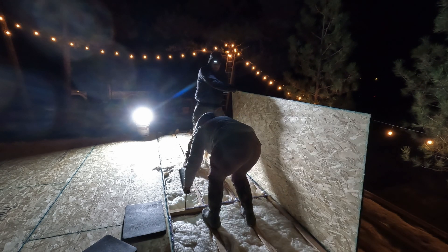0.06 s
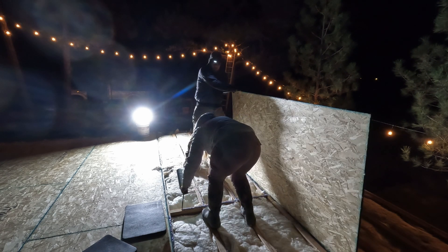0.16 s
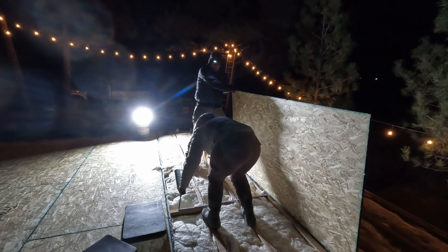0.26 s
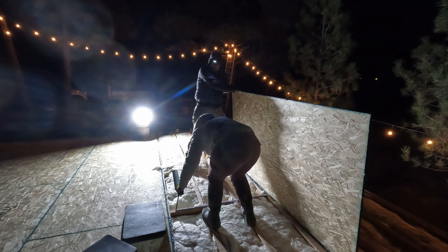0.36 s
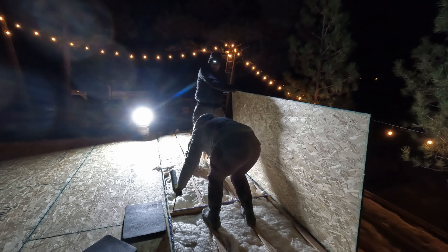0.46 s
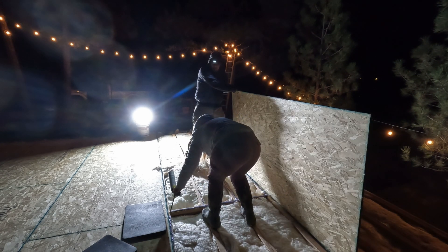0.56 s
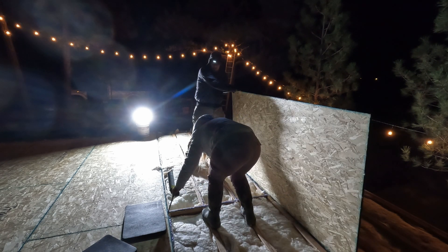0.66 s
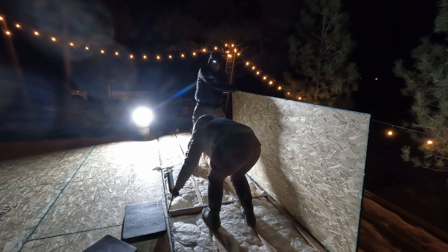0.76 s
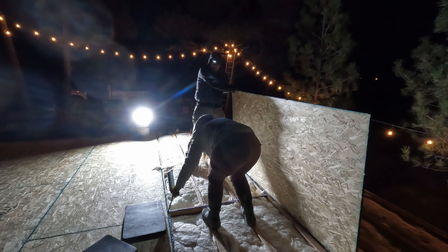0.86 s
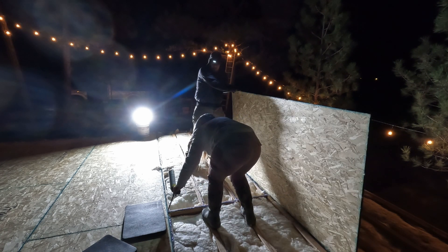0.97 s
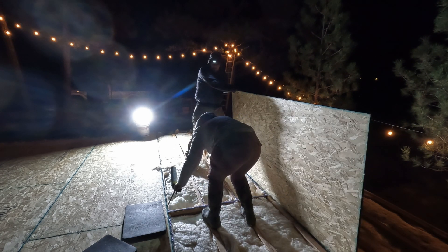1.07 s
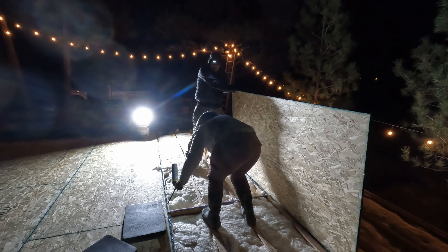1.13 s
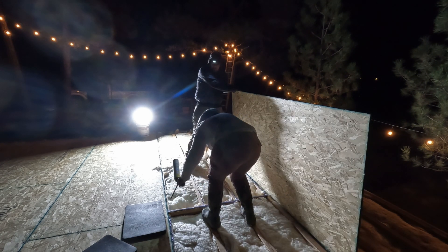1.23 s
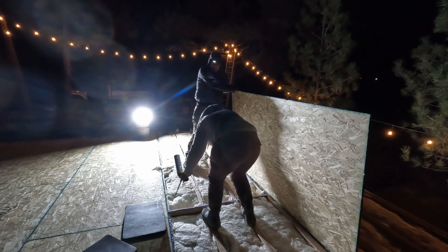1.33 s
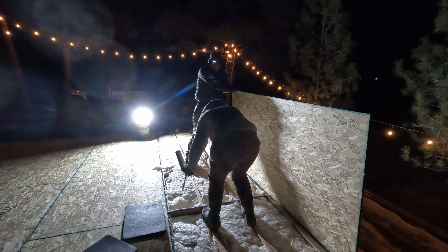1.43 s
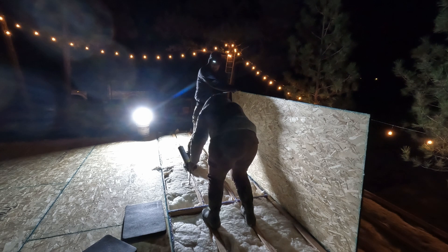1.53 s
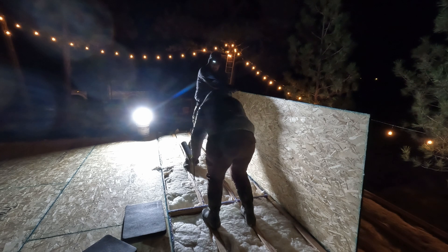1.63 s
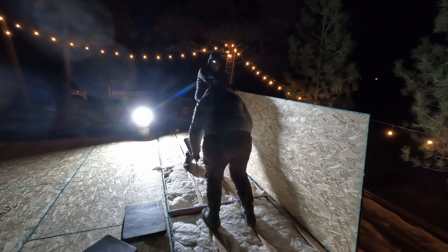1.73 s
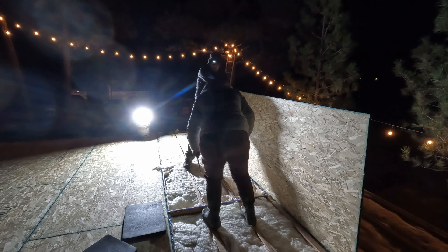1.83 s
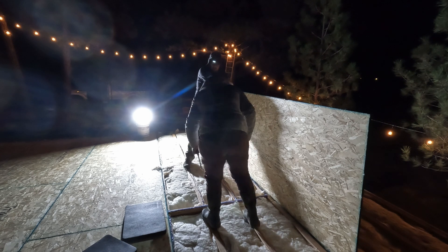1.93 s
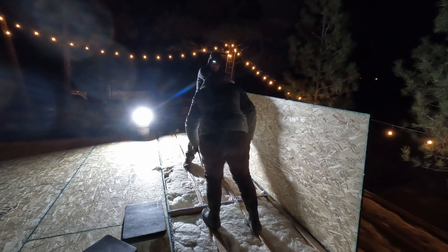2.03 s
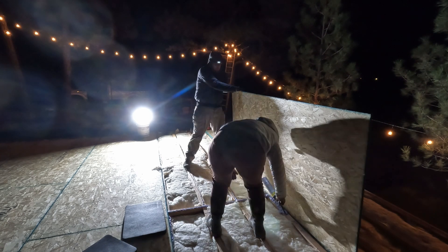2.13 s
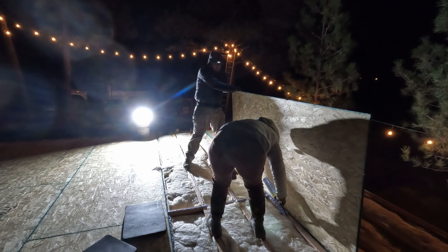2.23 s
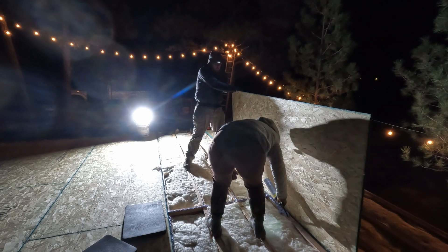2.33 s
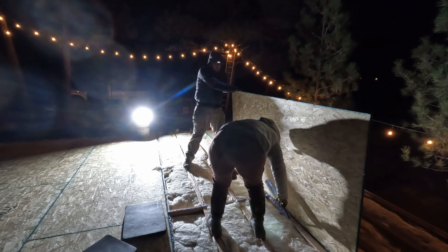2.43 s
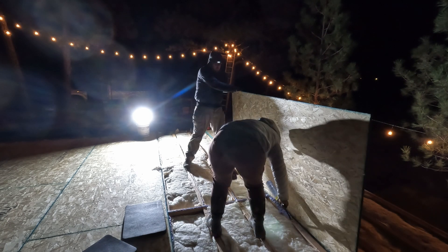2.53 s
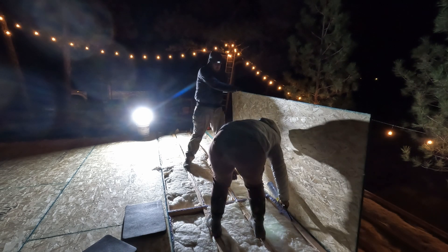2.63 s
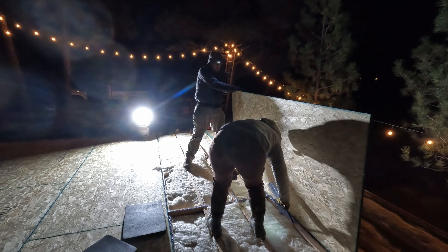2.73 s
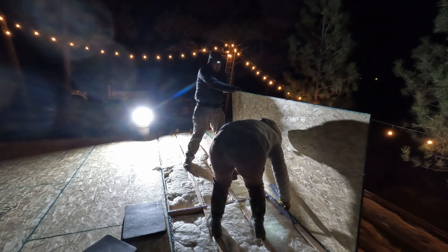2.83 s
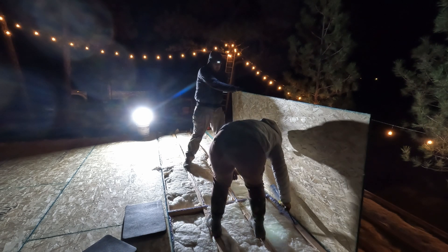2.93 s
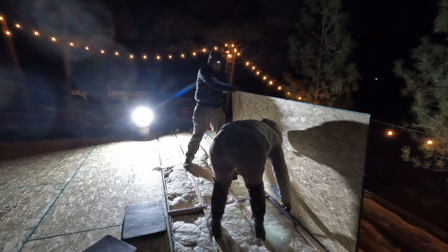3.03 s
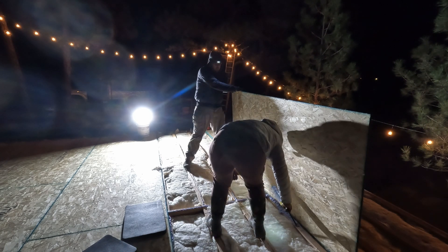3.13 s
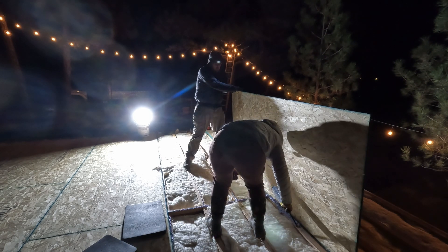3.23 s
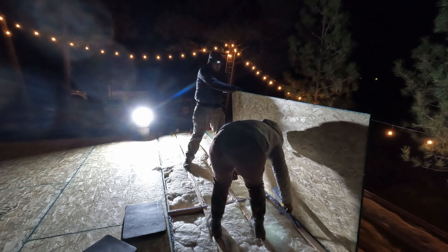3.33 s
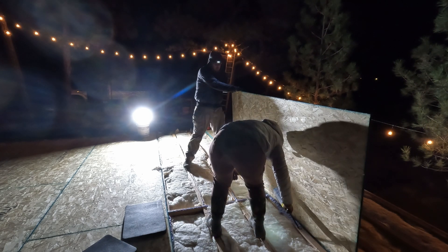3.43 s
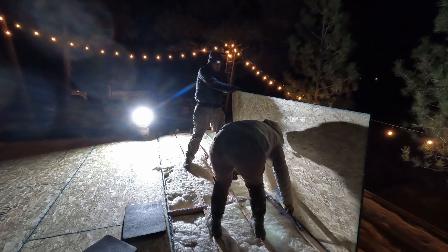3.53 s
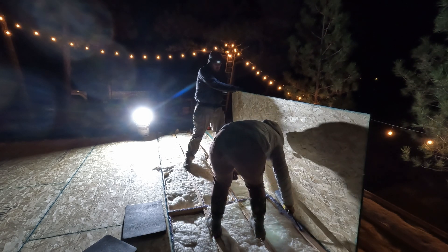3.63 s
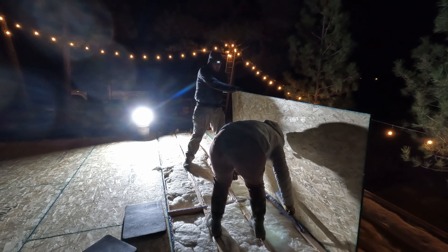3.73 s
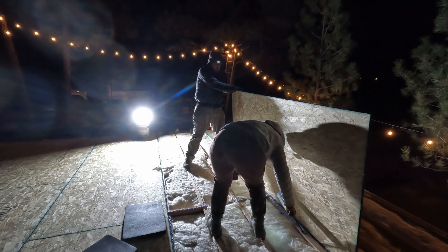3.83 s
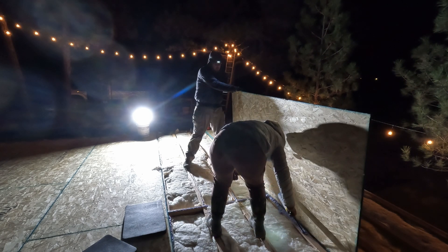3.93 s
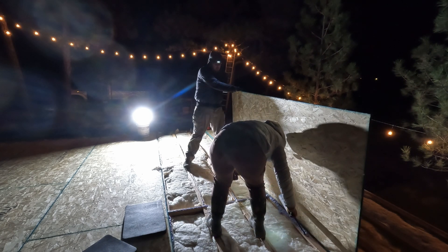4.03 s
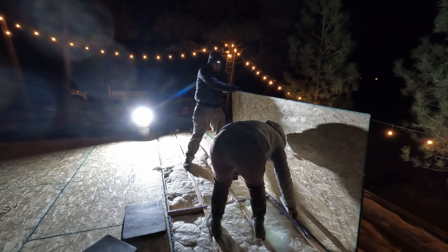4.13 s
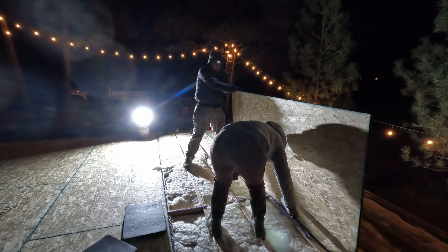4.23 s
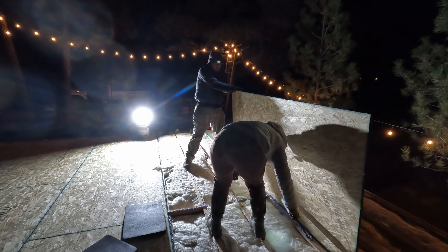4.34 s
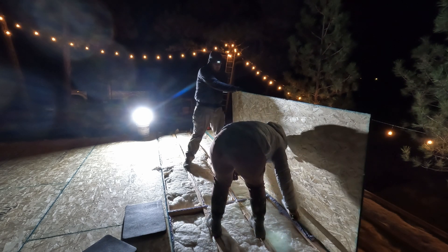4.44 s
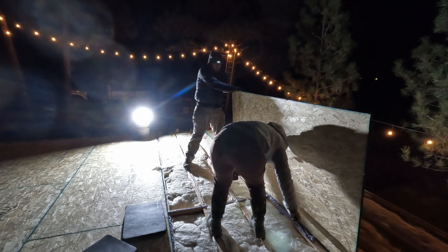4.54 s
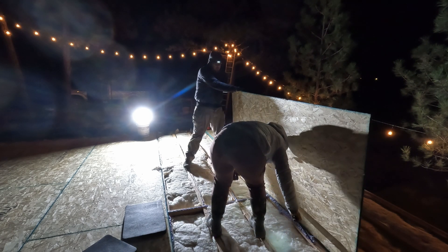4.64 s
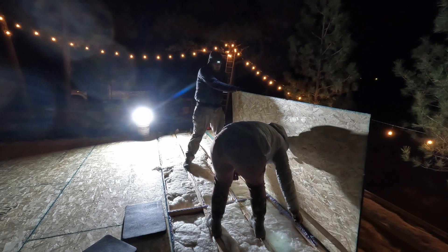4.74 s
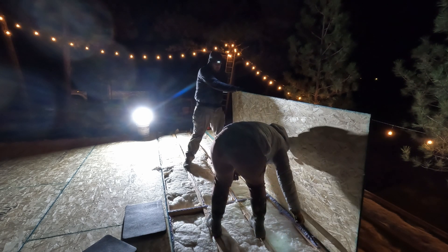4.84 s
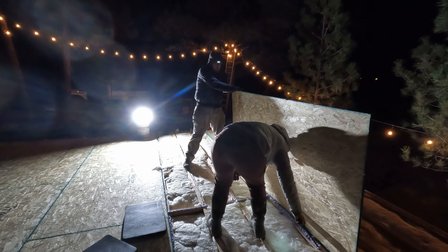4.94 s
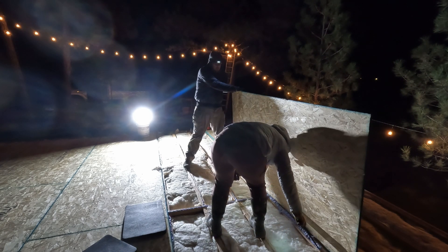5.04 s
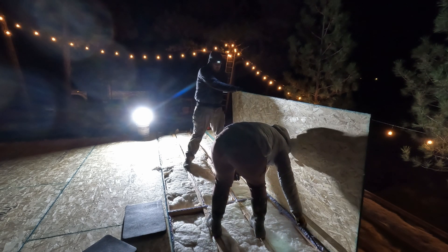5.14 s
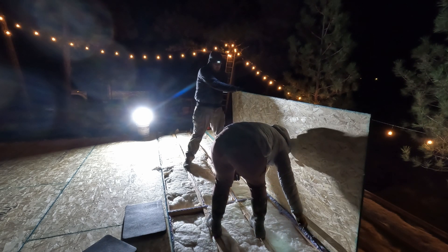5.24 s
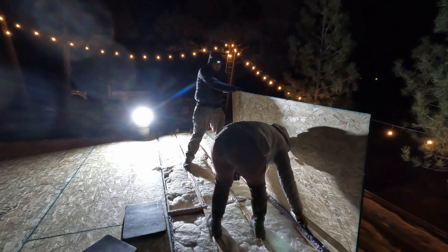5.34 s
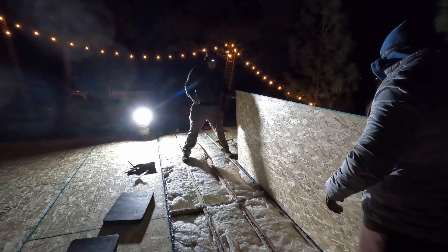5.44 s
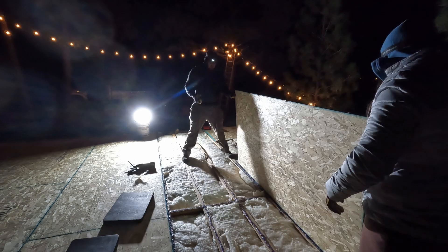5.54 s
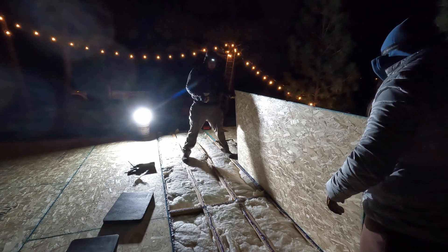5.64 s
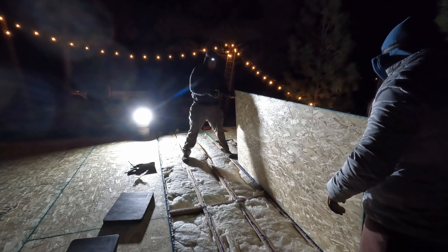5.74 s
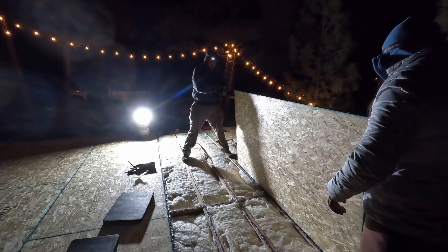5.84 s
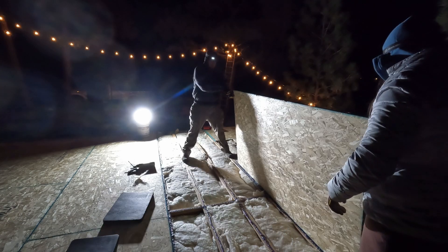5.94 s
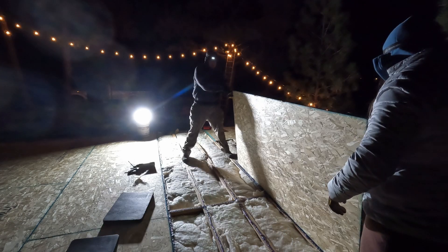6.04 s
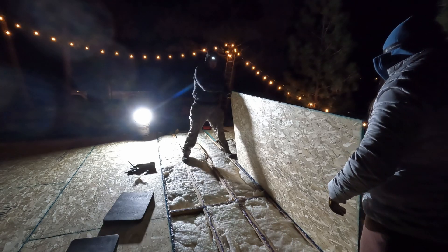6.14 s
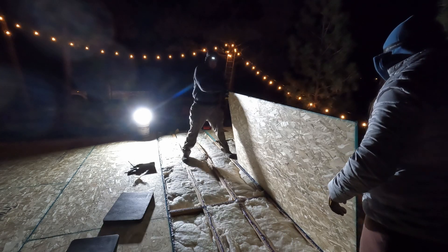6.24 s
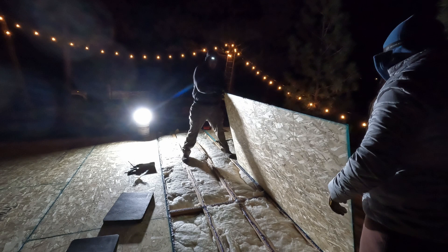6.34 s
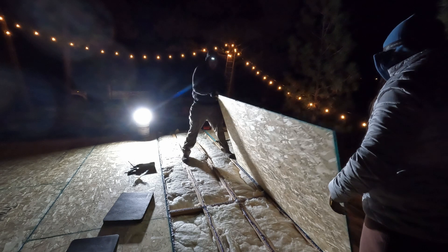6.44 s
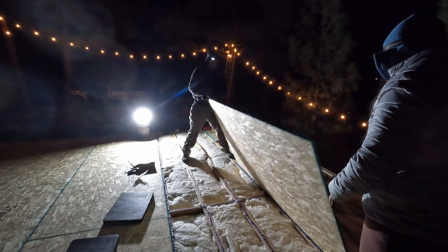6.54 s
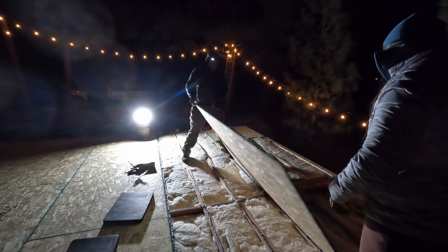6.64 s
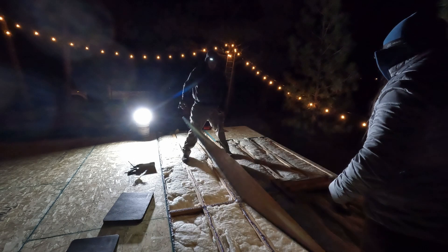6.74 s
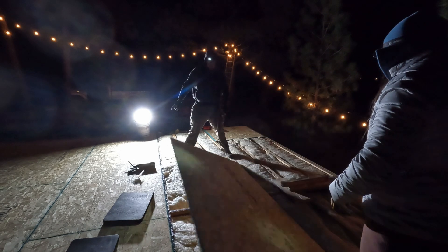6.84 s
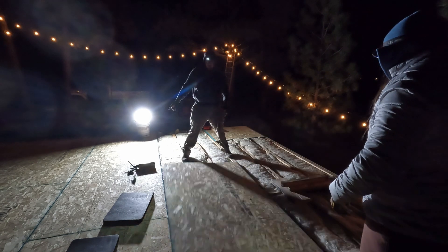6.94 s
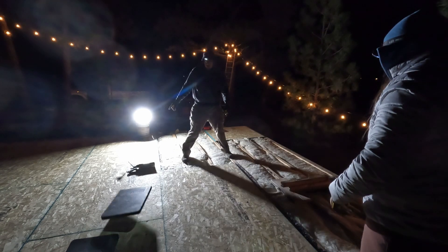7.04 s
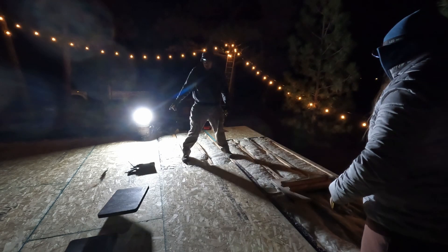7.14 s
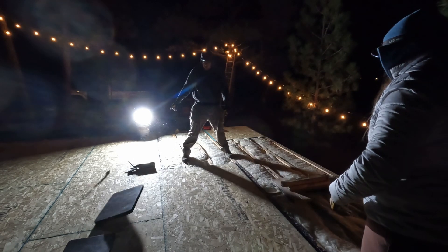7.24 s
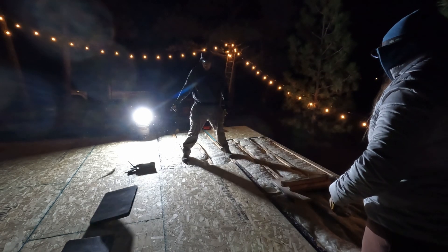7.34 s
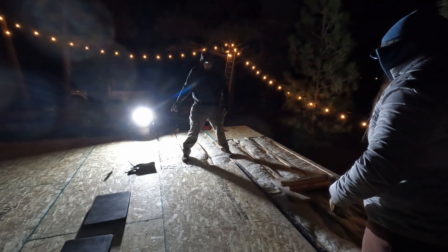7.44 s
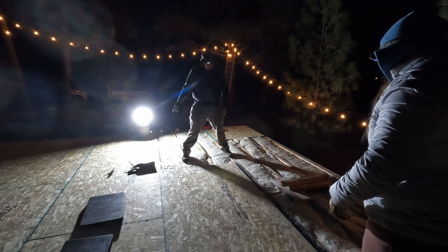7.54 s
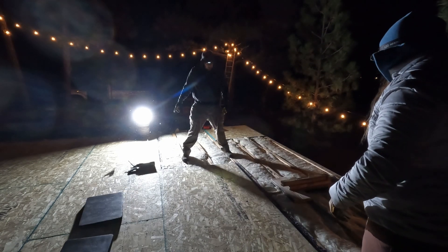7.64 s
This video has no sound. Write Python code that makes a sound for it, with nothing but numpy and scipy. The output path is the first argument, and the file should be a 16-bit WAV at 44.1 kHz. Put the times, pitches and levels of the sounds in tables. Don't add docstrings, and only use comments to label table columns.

```python
import sys
import numpy as np
from scipy import signal
from scipy.fft import rfft, irfft, next_fast_len
from scipy.io import wavfile
from scipy.ndimage import uniform_filter1d

SR = 44100
rng = np.random.default_rng(int(sys.argv[2]) if len(sys.argv) > 2 else 0)


def invert_db(x):
    u = np.asarray(x, float) / 20
    return 10 ** u


def transcribe(signal):
    frames = np.atleast_2d(signal).T
    limited = np.clip(frames, -1, 1)
    pcm = np.round(limited * 32767).astype(np.int16)
    wavfile.write(sys.argv[1], SR, pcm)


N = 339129
WIDE = next_fast_len(N, True)
BINS_HZ = np.fft.rfftfreq(WIDE, 1 / SR)

# (time [s], crackle level [dB], foam cavity [Hz], nozzle jet [Hz], small-cell fizz level [dB])
BEADS = [
    [(0, -50.5, 2000, 5340, -58), (.45, -50.5, 1920, 4900, -59), (.62, -48.5, 1890, 4200, -55),
     (.8, -45, 2000, 3630, -56), (.88, -53.5, 1940, 3600, -73), (.95, -68.5, 2000, 3600, -82)],
    [(2.09, -48, 1690, 4000, -60.5), (2.45, -45.5, 1700, 3930, -59), (2.8, -45, 1655, 5750, -62.5),
     (3.8, -44, 1680, 6050, -60.5), (4.6, -44, 1660, 5070, -57), (4.85, -44, 1500, 4100, -52),
     (5.33, -50, 1370, 4350, -57.5), (5.46, -95, 1530, 4700, -83)],
]
# (time [s], length [ms], gas level [dB], pop level [dB], jet [Hz])
SPITS_FIRST_BEAD = [(0.0005, 6, -51.5, -42, 3770), (0.0552, 9.5, -47, -37, 3510),
                    (0.1338, 9.5, -45.5, -36, 3640), (0.1636, 5, -44.5, -40.5, 4750),
                    (0.24, 10.5, -46.5, -37.5, 3790), (0.2976, 5.4, -42, -35, 4530),
                    (0.338, 8.4, -42, -38.5, 5410), (0.3576, 4.8, -44, -33.5, 4550),
                    (0.436, 8.7, -43.5, -34, 4220), (0.4518, 3.8, -58, -39, 3390),
                    (0.457, 7, -56, -41, 3490), (0.473, 1.5, -58, -40, 3440), (0.501, 7.7, -63, -44, 3820),
                    (0.5292, 7.6, -53.5, -38.5, 4860), (0.6115, 13.4, -50.5, -34.5, 3720),
                    (0.699, 2.8, -63, -39, 3500), (0.7266, 10, -41, -31.5, 3580),
                    (0.7437, 9.1, -57, -43, 3520), (0.7683, 7.8, -54, -34.5, 3640)]
# (time [s], length [ms], gas level [dB], pop level [dB], jet
# [Hz])
SPITS_SECOND_BEAD = [(2.2191, 7.7, -46, -34, 3540), (2.2502, 4.4, -44.5, -35, 4300),
                     (2.3077, 9.8, -43, -32.5, 3670), (2.3478, 6.3, -45, -34, 3800),
                     (2.375, 7.6, -45, -35, 3780), (2.389, 8.3, -44.5, -38.5, 3650),
                     (2.4862, 13.6, -40.5, -34.5, 3650), (2.5459, 7.6, -45, -33, 3630),
                     (2.589, 7.9, -45, -33.5, 3860), (2.6027, 10.6, -41, -33.5, 3840),
                     (2.647, 8.9, -39.5, -37, 5200), (2.6868, 3.5, -44.5, -33.5, 3720),
                     (2.706, 7.3, -34.5, -32, 3900), (2.8055, 7, -42.5, -31, 3630),
                     (2.8194, 4.5, -49, -33.5, 3620), (2.901, 5.5, -43, -31, 4330),
                     (2.9725, 8.5, -39, -33.5, 3840), (3.0495, 7.9, -42.5, -29, 4500),
                     (3.079, 8, -41, -33, 5300), (3.1324, 1.4, -45.5, -30, 6190),
                     (3.1559, 10.8, -42, -34.5, 5200), (3.2015, 6.9, -46.5, -35.5, 3780),
                     (3.2115, 8.4, -45, -35.5, 6240), (3.2616, 5.6, -41, -32, 3560),
                     (3.3444, 9.7, -49, -35.5, 5180), (3.3811, 11, -40.5, -33.5, 4140),
                    (3.4631, 5.9, -48.5, -37.5, 3920), (3.4966, 7.6, -40.5, -32, 5130),
                    (3.527, 10.5, -37.5, -30.5, 5570), (3.581, 7, -40.5, -32.5, 6290),
                    (3.655, 4.5, -42, -34.5, 5890), (3.6944, 9.4, -41, -31, 5630),
                    (3.779, 4.9, -37, -30, 5720), (3.8213, 9.1, -41, -30.5, 5250),
                    (3.8421, 14.5, -47.5, -34.5, 4920), (3.932, 7.8, -39, -30.5, 5140),
                    (3.9467, 2.9, -47, -34, 4640), (3.965, 5.9, -41, -35.5, 4720),
                    (3.9842, 4.8, -38.5, -33.5, 5660), (4.096, 14.6, -37, -33, 5650),
                    (4.149, 7.2, -37.5, -35, 5410), (4.192, 11.4, -35, -37, 4900),
                    (4.2552, 12.6, -32.5, -34.5, 6270), (4.3418, 8.5, -40, -33.5, 5560),
                    (4.394, 7.7, -36, -32, 5780), (4.4474, 9.8, -37.5, -34, 5350),
                    (4.4817, 10.5, -39, -35, 5040), (4.5459, 11.6, -37, -32.5, 5130),
                    (4.6042, 7.7, -38.5, -35.5, 5300), (4.6696, 13.4, -32, -32, 4530),
                     (4.704, 7.5, -44, -34.5, 5640), (4.758, 5.6, -35, -33, 5600),
                      (4.8245, 3.9, -46, -35, 4220), (4.833, 12.8, -43.5, -33, 3840),
                      (4.8584, 3.8, -46, -39, 3990), (4.8955, 7.3, -39.5, -32.5, 4940),
                      (4.942, 17, -45, -35.5, 4440), (5.0085, 9.4, -42.5, -36, 4860),
                      (5.0285, 7.6, -46, -32.5, 4040), (5.0408, 5.8, -45.5, -34, 4690),
                      (5.1027, 10.8, -35, -35, 4970), (5.1288, 3.4, -42, -28.5, 4190),
                      (5.1484, 12.4, -39.5, -33, 4630), (5.1881, 2.4, -38, -33, 4250),
                      (5.1982, 9.2, -33, -33, 4630), (5.2646, 2.6, -39.5, -29.5, 5050),
                      (5.2924, 2, -53, -34.5, 3830), (5.3, 10, -34, -28.5, 5100),
                      (5.329, 5.1, -34.5, -30.5, 4900)]
# (time [s], length [ms], pop level [dB])
WET_PLOPS = [(0.041, 2.1, -34.5), (.564, 1.5, -44), (0.598, 2.3, -41), (0.6747, 7.3, -38), (0.686, 7, -43),
             (0.7779, 7.2, -30), (0.859, 5.4, -44.5), (2.1441, 5, -36), (2.182, 5.3, -30.5),
             (2.237, 9.7, -33.5), (2.445, 8.6, -32), (2.7739, 5.3, -28.5), (2.884, 7.8, -32.5),
             (2.9354, 10.2, -29), (2.995, 5.2, -37), (3.2408, 1.6, -28), (3.2995, 7.8, -31),
             (3.3294, 2.2, -29.5), (3.43, 9, -38), (3.5392, 2, -28), (3.5539, 1, -34), (3.724, 6.6, -35),
             (3.8332, 2.2, -32), (3.863, 2.1, -33.5), (4.0647, 7.5, -35), (4.2489, 1.6, -28),
             (4.917, 2.1, -28), (4.994, 1.6, -32), (5.2401, 1.3, -31)]
# (time [s], level [dB])
LARGE_CELLS = [(0.0411, -30), (0.0995, -35), (0.1215, -37), (0.2002, -35), (0.2273, -35), (0.3187, -39),
               (0.371, -36), (0.5658, -29), (0.6777, -30), (0.6867, -36), (0.7956, -36), (0.8111, -36),
               (0.8608, -29.5), (2.1542, -34), (2.246, -35), (2.2926, -31), (2.5311, -38), (2.7654, -27),
               (2.8299, -32), (2.991, -37), (3.116, -31), (3.2882, -32), (3.3038, -30), (3.3286, -36),
               (3.4312, -23.5), (3.518, -33), (3.5703, -28), (3.6025, -37), (3.6154, -36), (3.6404, -27),
               (3.6653, -34), (3.772, -34), (3.8074, -24), (3.917, -27), (4.0037, -30), (4.0267, -38),
               (4.047, -34), (4.1722, -38), (4.2258, -31), (4.5314, -25), (4.5673, -29), (4.6408, -33),
               (5.0795, -30), (5.088, -25), (5.229, -31), (5.242, -32), (5.256, -37)]
# (time [s], level [dB])
GAS_LEAK = [
    (1.1, -74),
    (1.3, -58.5),
    (1.78, -47),
    (2.1, -47.5),
    (2.14, -89),
]
# (frequency [Hz], level [dB])
POP_COLOUR = [(300, -15.5), (650, -13.5), (950, 0.5), (2500, -0.5), (3300, -2.5), (4500, -10.5),
              (9000, -61)]
# (frequency [Hz], level [dB])
CRACKLE_COLOUR = [(300, -26.5), (600, -12.5), (820, -11), (1050, 0.5), (2300, -5), (2900, -11.5),
                  (3600, -23.5), (9000, -72.5)]
# (frequency [Hz], level [dB])
JET_COLOUR = [(2000, -34), (3500, 3), (4500, 2.5), (7200, 6), (8200, -1), (10500, -7), (13000, -17),
              (15600, -28)]
# (frequency [Hz], level [dB])
FIZZ_COLOUR = [(2600, -19.5), (3250, -13.5), (3900, -13), (5500, -19), (7600, -20.5), (8600, -19),
               (10500, -29), (15000, -73.5)]
# (frequency [Hz], level [dB])
LEAK_COLOUR = [(290, -26.5), (500, -9), (577, -7.5), (737, -13.5), (1030, -4), (1900, -0.5), (6740, -4),
               (10500, -11), (13800, -32), (15500, -39.5)]

# (frequency [Hz], level [dB], decay T60 [s])
PANEL_MODES = [(31.4, -13.5, 1), (50.5, -14, 0.59), (104.8, -15, 0.84), (157.4, -16, 0.36),
               (197.4, -30, 0.48), (228, -19.5, 0.5), (326, -9.5, 0.057), (368, -47, 0.28),
               (488, -22.5, 0.11), (563, -7, 0.014)]
# (time [s], level [dB], rise [dB/s], fall [dB/s])
BOARD_CLATTER = [
    (7.12, -14.5, 888, 800),
    (7.18, -36.5, 502.5, 70.5),
    (7.61, -73.5, 401.5, 133.5),
]
# (time [s], level [dB], rise [dB/s], fall [dB/s])
BLOWN_GRIT = [
    (7.12, -24.5, 790, 6500),
    (7.3, -69, 14, 3.9),
    (7.61, -58, 860, 270),
]
# (frequency [Hz], level [dB])
GRIT_COLOUR = [(3000, -16.5), (4000, -13), (7600, -17.5), (10500, -27), (15500, -42)]
# (time [s], level [dB], pitch [Hz])
GRIT_TICKS = [(7.015, -45, 7440), (7.1171, -1, 1100), (7.1172, -7, 9000), (6.2325, -31, 2000),
              (7.1282, -18, 3000), (7.1362, -13.5, 3480), (7.1797, -20, 2800), (7.078, -36, 2990),
              (6.1935, -38, 2300), (7.193, -38, 6000), (7.213, -43, 4970), (7.277, -44, 6500),
              (7.284, -46, 6500), (7.313, -47, 5500), (7.328, -50, 6500), (7.42, -43, 5000),
              (7.442, -50, 6500), (7.458, -50, 6000), (7.486, -53, 4520), (7.518, -52, 5470),
              (7.585, -52, 4000), (7.603, -50, 5500), (7.628, -47, 6500)]
# (frequency [Hz], level [dB])
TICK_DISTANCE = [(300, -1), (5000, -1.5), (8000, -4), (11000, -14), (15000, -26)]
# (time [s], snap level [dB], treble level [dB], body level [dB])
WOOD_KNOCKS = [(4.92, -39, -56, -12.5), (6.233, -40, -46.5, -36.5), (6.493, -63, -47.5, -78),
               (6.727, -56, -50, -65), (6.927, -82, -56.5, -69), (7.0765, -55, -55, -34),
               (7.1158, 8.5, -27, -34.5), (7.134, 0.5, -39, -8.5), (7.144, -2, -62, -17.5),
               (7.1776, -40, -31.5, -31), (7.212, -34, -35.5, -22), (7.242, -21, -56, -21),
               (7.275, -26, -68, -22), (7.373, -39, -48, -20.5), (7.128, -13, -43, -29),
               (7.604, -48.5, -58.5, -36), (7.636, -53, -50.5, -63)]
# (frequency [Hz], level [dB])
SNAP_COLOUR = [(300, -24), (700, -5.5), (1200, 4.5), (2000, -3.5), (3000, -18), (4500, -29.5), (10000, -84)]
# (frequency [Hz], level [dB], decay T60 [s])
BOARD_MODES = [(188, -21.5, 0.2), (313, -14, 0.043), (381, -13.5, 0.06), (441, 3, 0.0081),
               (590, -22, 0.055), (800, -28, 0.062)]
# (frequency [Hz], level [dB])
HOLLOW_COLOUR = [(30, -33), (70, -6), (250, -2), (500, -8), (1000, -16.5), (4000, -79)]
# (time [s], level [dB], hold [s])
EDGE_SCUFFS = [
    (6.193, -41.5, 0.068),
    (6.34, -68, .05),
    (6.415, -54.5, 0.021),
    (6.488, -61, 0.09),
    (6.645, -58, 0.06),
    (6.719, -48.5, .005),
    (6.992, -57.5, 0.063),
]
# (frequency [Hz], level [dB])
GRIND_COLOUR = [(500, -68.5), (1000, 1), (1500, -8), (1800, 5), (2600, -25.5), (3600, -31.5), (6700, -27),
                (12000, -64)]

# (time [s], sway level [dB], boom level
# [dB], length [s])
DECK_LOADS = [(0.123, -59, -68, 1.6), (1.53, -56, -73, 1.9), (2.012, -39.5, -47, 0.24),
              (2.804, -47.5, -48.5, 0.65), (3.35, -65, -65, 1.7), (3.937, -53, -55.5, 1.6),
              (4.577, -73, -57.5, 0.92), (4.985, -39, -38.5, 0.13), (5.132, -50, -53, 0.37),
              (6.264, -43.5, -45, 0.19), (6.653, -58.5, -75.5, 2.4), (7.008, -40.5, -76, 0.15),
              (7.16, -28, -26, 0.18), (7.253, -43.5, -27, 0.16), (7.379, -51.5, -43.5, 0.092),
              (7.482, -36.5, -74.5, 0.87), (7.638, -48, -49, 0.15)]
# (frequency [Hz], level [dB])
SWAY_COLOUR = [(10, -15), (20, 15), (32, 11), (50, 7), (65, -7.5), (100, -57.5), (300, -94.5)]
# (frequency [Hz], level [dB])
BOOM_COLOUR = [(45, -28.5), (70, 5.5), (105, -1.5), (155, 9.5), (230, -0.5), (330, -12), (500, -25.5),
               (1500, -102)]
# (time [s], first pitch [Hz], last pitch [Hz], length [s], level [dB])
SINGLE_FLEXES = [(1.915, 228, 330, 0.075, -48), (7.135, 220, 200, 0.052, -29.5),
                 (7.245, 330, 292, 0.045, -30.5), (7.21, 350, 430, 0.041, -34),
                 (2.692, 131, 81, 0.279, -41), (6.227, 143, 42.5, 0.205, -44),
                 (6.716, 51.5, 30, 0.087, -41.5), (6.902, 32.6, 22, 0.12, -35),
                 (7.256, 23.6, 22, 0.14, -17), (7.1145, 130, 104, 0.074, -16.5),
                 (4.921, 220, 186, 0.11, -37.5), (7.104, 340, 320, .02, -20),
                 (7.108, 900, 740, 0.0069, -20), (7.59, 186, 169, 0.049, -42)]
# (frequency [Hz], decay T60 [s], level [dB])
YARD_DECAY = [(70, .055, -28), (198, 0.068, 8.5), (1006, 0.038, 8.5), (4000, 0.094, -1.5),
              (11940, 0.065, -15)]
# (frequency [Hz], level [dB])
NIGHT_COLOUR = [(150, -40), (250, -3.5), (300, -6), (600, -15), (780, -21.5), (1010, -12.5), (2490, -11),
                (3890, -27), (5790, -22), (8000, -25), (11000, -33.5), (13500, -44), (16000, -88)]
# (frequency [Hz], likeness [0 to 1])
NIGHT_LIKENESS = [(60, 0.62), (240, 0.092), (950, 0.47), (3770, 0.79), (15000, 0.61)]

# (frequency [Hz], level [dB])
GUN_LEAN = [(100, -3), (1500, -3.6), (4400, -2.8), (9000, 0)]
# (frequency [Hz], level [dB])
PANEL_LEAN = [(200, -.4), (2500, -1.2), (9000, 1.5), (11000, 6), (15000, 0)]
# (frequency [Hz], phase [rad])
PORT_PHASE = [(800, -.05), (3500, -.5), (8000, -.55), (11000, -1.1), (14000, -2)]
# (frequency [Hz], level [dB])
PORT_RESPONSE = [(20, -2), (11000, -4), (14500, 2.5), (15700, -12), (16200, -55)]

PLOP_GAS_DB, PLOP_GAS_DB_PER_DECADE = -13, 7
FIRST_BEAD_LEFT_DB, SECOND_BEAD_S = 2, 2.08
SLAM_S, FAR_EDGE_S = 7.114, 0.00756
TICK_CYCLES, SNAP_MS = 1, 3.3
SCUFF_RISE_DB_PER_S, SCUFF_FALL_DB_PER_S = 1500, 453
RUB_HZ, SLIP_HZ, SLIP_FADE_DB_PER_S = 1524, 1050, 266
REST_SWAY_DB, REST_BOOM_DB, STEP_RANGE_DB, STEP_RISE_SHARE = -65.5, -65, 27, 0.53
NIGHT_DB, NIGHT_SWELL_DB = -62, 1.25


def evened(x):
    return x / np.sqrt(np.mean(x ** 2) + 1e-20)


def read(points, hz):
    f, value = np.transpose(points)
    return np.interp(np.log(hz + 1), np.log(f + 1), value)


def follow(rows, column=1, outside=-120):
    rows = np.array(rows)
    return np.interp(np.arange(N) / SR, rows[:, 0], rows[:, column], outside, outside)


def coloured(x, points, size=4096):
    gain_db = np.maximum(read(points, abs(np.fft.fftfreq(size, 1 / SR))), -100)
    log_gain = np.log(invert_db(gain_db))
    response = np.exp(log_gain - 1j * signal.hilbert(log_gain).imag)
    taps = np.fft.ifft(response).real[:size // 2]
    return signal.oaconvolve(x, taps / np.linalg.norm(taps))[:N]


def resonate(x, hz, width_hz):
    turn = np.exp(2j * np.pi * np.cumsum(hz) / SR)
    r = np.exp(-np.pi * width_hz / SR)
    return np.sqrt(2 * (1 - r * r)) * (turn * signal.lfilter([1], [1, -r], x / turn)).real


def clicks(per_s, spread_db):
    size = invert_db(spread_db * np.minimum(rng.exponential(1, N), 4)) * rng.choice([-1, 1], N)
    return evened(size * (rng.random(N) < per_s / SR))


def humps(s, db, rise_db_per_s, fall_db_per_s, hold_s=0.):
    t = np.arange(0, N / SR, 1 / 2000)
    late = t[:, None] - s
    rise_db = np.minimum(late, 0) * rise_db_per_s
    fall_db = np.maximum(late - hold_s, 0) * fall_db_per_s
    gain = invert_db(db + rise_db - fall_db)
    return np.interp(np.arange(N) / SR, t, gain.sum(axis=1))


def ring(modes, t):
    return sum(invert_db(db - 60 * t / t60) * np.sin(2 * np.pi * hz * t) for hz, db, t60 in modes)


def gun():
    bursts = clicks(3000, 2.4)
    pop, hiss, jet_hz, detune = spurts(bursts)
    clumps = invert_db(2.3 * evened(uniform_filter1d(rng.standard_normal(N), 350)))
    crackle = evened(clumps * clicks(750, 1.86))
    gas = hiss * evened(rng.standard_normal(N) + 0.93 * bursts)
    jet = coloured(0.68 * gas + 0.84 * resonate(gas, jet_hz, 1300), JET_COLOUR)
    leak = invert_db(follow(GAS_LEAK)) * coloured(rng.standard_normal(N), LEAK_COLOUR)
    return foam(pop, crackle, detune) + jet + fizz(clumps, crackle) + leak


def pockets():
    rows = SPITS_FIRST_BEAD + SPITS_SECOND_BEAD
    spits = [(s, ms, pop_db + 0.23, gas_db + 11, hz) for s, ms, gas_db, pop_db, hz in rows]
    bead_s, bead_jet_hz = np.array(BEADS[0] + BEADS[1])[:, [0, 3]].T
    plops = []
    for s, ms, db in WET_PLOPS:
        hiss_db = db + PLOP_GAS_DB + PLOP_GAS_DB_PER_DECADE * np.log10(ms)
        plops.append((s, ms, db, hiss_db, np.interp(s, bead_s, bead_jet_hz)))
    return sorted(spits + plops)


def spurts(bursts):
    pop, hiss, detune = np.zeros(N), np.zeros(N), np.ones(N)
    jet_hz = np.full(N, 5000.)
    rows = pockets()
    for (s, ms, pop_db, hiss_db, hz), luck in zip(rows, rng.standard_normal((len(rows), 2))):
        u = np.linspace(0, 1.3, int(1.4 * ms * SR / 1000) + 30)
        at = slice(round(s * SR), round(s * SR) + len(u))
        edges = np.minimum(u / 0.12, 1) * np.exp(-np.maximum(u - .8, 0) / 0.18)
        froth = evened(edges * np.exp(-((u - .33) / 0.46) ** 2) * bursts[at])
        froth[12] += (0.21 + 0.28 * abs(luck[1])) * np.sqrt(len(u))
        pop[at] += invert_db(pop_db) * evened(froth)
        hiss[at] += invert_db(hiss_db - 8.5) * evened(edges * np.exp(-((u - .6) / 0.5) ** 2))
        jet_hz[at.start:] = hz
        detune[at.start:] = 1 + 0.068 * luck[0]
    return pop, hiss, jet_hz, detune


def bead_gain(column):
    return invert_db(np.maximum(follow(BEADS[0], column), follow(BEADS[1], column)))


def foam(pop, crackle, detune):
    bed = bead_gain(1) * crackle
    for s, db in LARGE_CELLS:
        bed[round(s * SR)] += invert_db(db + 13.5)
    bead_hz = follow(BEADS[0] + BEADS[1], column=2, outside=None)
    small = np.clip((bead_hz - 1500) / 600, 0, 1)
    out = 0
    for cells, colour in (pop, POP_COLOUR), (bed, CRACKLE_COLOUR):
        rung = resonate(resonate(cells, bead_hz * detune, 1800), bead_hz * detune, 1810)
        cells = 0.45 * cells + 0.34 * rung
        raised = [(1.31 * hz, db) for hz, db in colour]
        out += coloured((1 - small) * cells, colour) + coloured(small * cells, raised)
    return out


def fizz(clumps, crackle):
    fine = bead_gain(4) * evened(clumps * clicks(1500, 5.3) + 0.75 * crackle)
    jet_hz = follow(BEADS[0] + BEADS[1], column=3, outside=None)
    return coloured(0.45 * fine + resonate(fine, jet_hz, 1500), FIZZ_COLOUR)


def panel():
    t = np.arange(N) / SR - SLAM_S
    cushion = -.32 * np.exp(-((t + 0.0041) / np.where(t < -.004, .012, .005)) ** 2)
    clatter = humps(*np.transpose(BOARD_CLATTER)) * coloured(clicks(2900, 3.3), SNAP_COLOUR)
    grit = humps(*np.transpose(BLOWN_GRIT)) * coloured(clicks(6000, 2.2), GRIT_COLOUR)
    return cushion + slam(t) + crack(t) + clatter + grit + ticks()


def slam(t):
    rattle = evened(signal.oaconvolve(rng.standard_normal(N), np.hanning(1500), "same"))
    after = np.maximum(t, 0)
    contact = 1 + np.minimum(after / 0.12, 1) * (0.39 * rattle - .6)
    upper = ring(PANEL_MODES[2:], np.maximum(t - FAR_EDGE_S, 0))
    return ring(PANEL_MODES[:2], after) + upper * contact


def crack(t):
    u = np.maximum(t - .0054, 0)
    cycles = 900 * u + 2.39 * (1 - np.exp(-u / 0.00093))
    envelope = np.exp(-(u / 0.0019) ** 2) * np.minimum(u / 0.00023, 1)
    return 1.2 * np.sin(2 * np.pi * cycles) * envelope


def ticks():
    out, t = np.zeros(N), np.arange(200) / SR
    for (s, db, hz), noise in zip(GRIT_TICKS, rng.standard_normal((len(GRIT_TICKS), len(t)))):
        tap = 1.84 * np.sin(2 * np.pi * hz * t) * np.exp(-t * hz / TICK_CYCLES)
        tap += 0.13 * noise * hz / 5000 * np.exp(-t / 0.00061)
        out[round(s * SR):][:len(t)] += invert_db(db) * tap
    return 0.63 * coloured(out, TICK_DISTANCE)


def knocks():
    snap, treble, blow = np.zeros((3, N))
    t = np.arange(1500) / SR
    noises = rng.standard_normal((len(WOOD_KNOCKS), len(t)))
    for (s, snap_db, treble_db, body_db), noise in zip(WOOD_KNOCKS, noises):
        at = slice(round(s * SR), round(s * SR) + len(t))
        burst = noise * np.exp(-t * 1000 / SNAP_MS) * np.minimum(t / 0.0026, 1)
        snap[at] += invert_db(snap_db - 9.0) * burst
        treble[at] += invert_db(treble_db + 5.5) * burst
        blow[at.start] = invert_db(body_db - 9.0)
    t = np.arange(12000) / SR
    body = signal.oaconvolve(blow, ring(BOARD_MODES, t))[:N]
    rumble = signal.oaconvolve(blow, rng.standard_normal(len(t)) * invert_db(-8 - 60 * t / 0.27))[:N]
    bright = coloured(treble, POP_COLOUR) + coloured(treble, FIZZ_COLOUR)
    return coloured(snap, SNAP_COLOUR) + bright + body + coloured(rumble, HOLLOW_COLOUR, size=8192)


def edge():
    s, db, hold_s = np.transpose(EDGE_SCUFFS)
    rub = humps(s, db, SCUFF_RISE_DB_PER_S, SCUFF_FALL_DB_PER_S, hold_s)
    grit = clicks(4000, 4.2)
    rub_hz = RUB_HZ + SLIP_HZ * humps(s[0], 0, SCUFF_RISE_DB_PER_S, SLIP_FADE_DB_PER_S)
    sung = grit
    for width_hz in (690, 1050, 2100):
        sung = resonate(sung, rub_hz, width_hz)
    return rub * evened(coloured(grit, GRIND_COLOUR) + .5 * sung)


def deck():
    s, sway_db, boom_db, length_s = np.transpose(DECK_LOADS)
    fall = STEP_RANGE_DB / length_s
    out = np.zeros(N)
    for rest_db, db, colour in [(REST_SWAY_DB, sway_db, SWAY_COLOUR), (REST_BOOM_DB, boom_db, BOOM_COLOUR)]:
        gain = invert_db(rest_db) + humps(s, db, fall / STEP_RISE_SHARE, fall)
        out += gain * coloured(rng.standard_normal(N), colour, size=16384)
    for s, first_hz, last_hz, length_s, db in SINGLE_FLEXES:
        hz = np.geomspace(first_hz, last_hz, int(length_s * SR))
        flex = invert_db(db) * signal.windows.tukey(len(hz), .7) * np.cos(2 * np.pi * np.cumsum(hz) / SR)
        out[round(s * SR):][:len(hz)] += flex[:N - round(s * SR)]
    return out


def yard(x):
    hz, t, z = signal.stft(rng.standard_normal((2, SR // 4)), SR, nperseg=128)
    t60, db = (read([(row[0], row[k]) for row in YARD_DECAY], hz)[:, None] for k in (1, 2))
    tail = signal.istft(z * invert_db(db - 60 * t / t60), SR, nperseg=128)[1]
    tail = tail * np.clip(np.arange(tail.shape[1]) / SR / .004 - .5, 0, 1)
    tail = tail / np.linalg.norm(tail, axis=1, keepdims=True)
    return signal.oaconvolve(x[None], tail, axes=1)[:, :N]


def night():
    left, other = (coloured(rng.standard_normal(N), NIGHT_COLOUR) for side in "LR")
    same = np.clip(read(NIGHT_LIKENESS, BINS_HZ), 0, 1)
    right = irfft(same * rfft(left, WIDE) + np.sqrt(1 - same ** 2) * rfft(other, WIDE), WIDE)[:N]
    swell = evened(signal.oaconvolve(rng.standard_normal(N), np.hanning(9000), "same"))
    return invert_db(NIGHT_DB + NIGHT_SWELL_DB * swell) * np.array([left, right])


def pair(x, lean):
    tilt = invert_db(read(lean, BINS_HZ) / 2) * np.exp(.5j * read(PORT_PHASE, BINS_HZ))
    return irfft(rfft(x, WIDE) * [tilt, 1 / tilt], WIDE)[:, :N]


def scene():
    glue, wood = gun(), knocks() + panel()
    nearer_db = FIRST_BEAD_LEFT_DB / 2 * (np.arange(N) < SECOND_BEAD_S * SR)
    beads = invert_db(-4.5) * pair(glue, GUN_LEAN) * invert_db([nearer_db, -nearer_db])
    close = beads + pair(edge(), GUN_LEAN) + pair(wood, PANEL_LEAN)
    far = yard(invert_db(-23) * glue + invert_db(-25) * wood)
    return close + deck() * invert_db([[-.2], [.2]]) + far + pair(night(), PANEL_LEAN)


def roll_off(x):
    return signal.sosfilt(signal.butter(12, 15680, fs=SR, output="sos"), x)


def record(dry):
    dulled = irfft(rfft(dry, WIDE) * invert_db(read(PORT_RESPONSE, BINS_HZ)), WIDE)[:, :N]
    mix = 1.062 * np.tanh(dulled / 1.27)
    return roll_off(mix)


dry = scene()
out = record(dry)
transcribe(out)
```